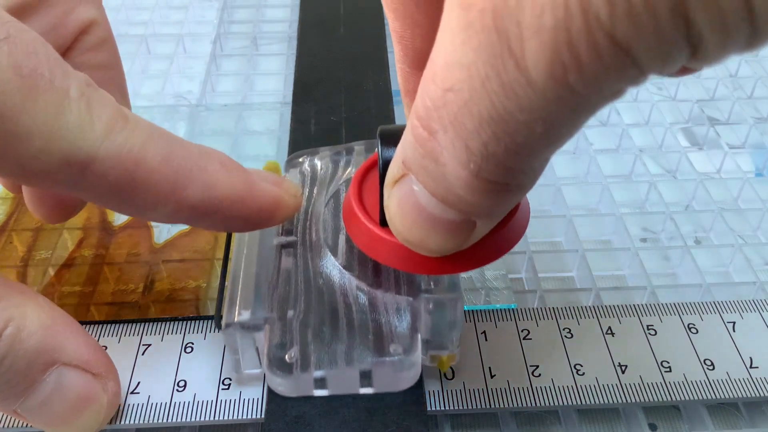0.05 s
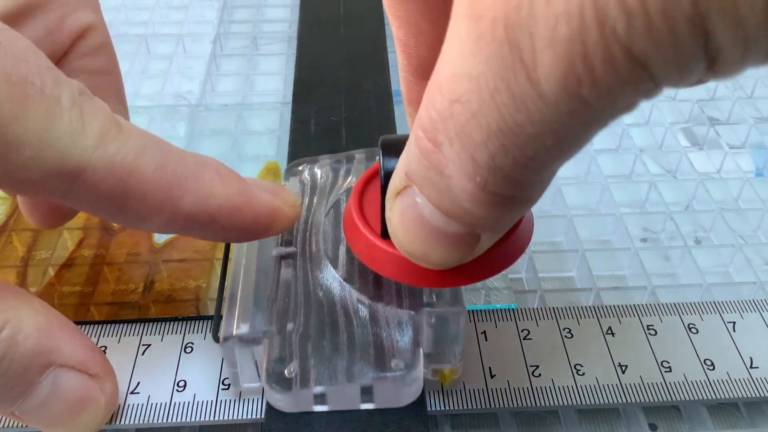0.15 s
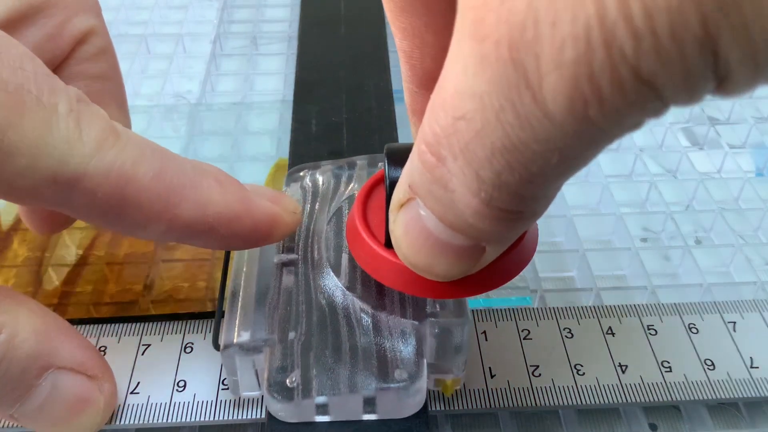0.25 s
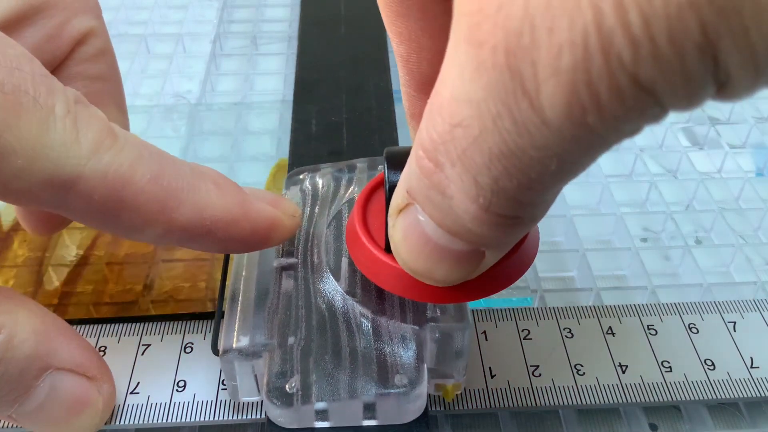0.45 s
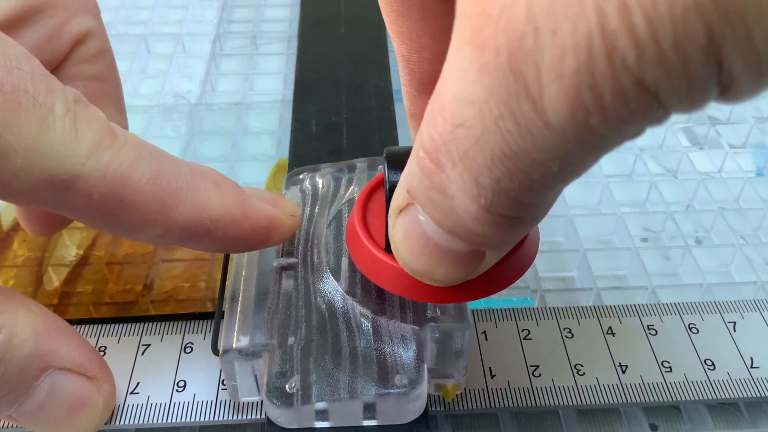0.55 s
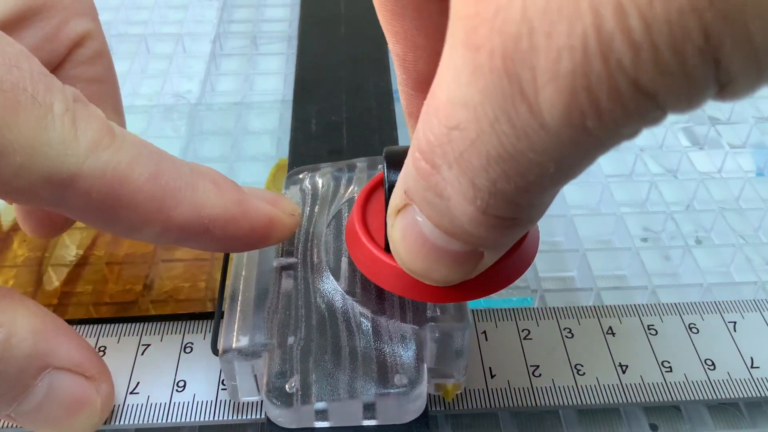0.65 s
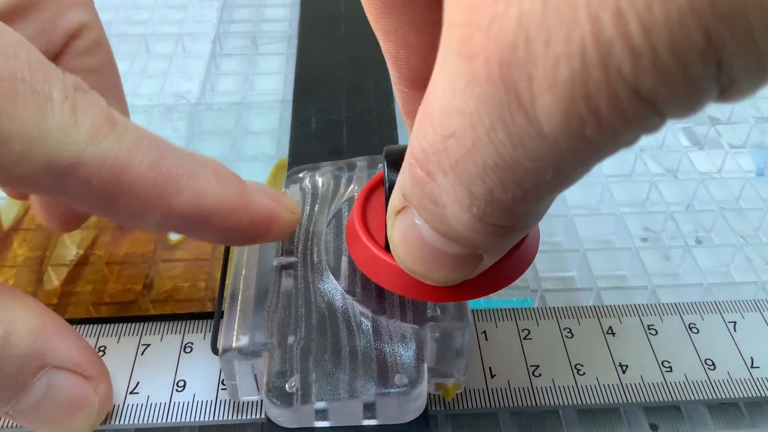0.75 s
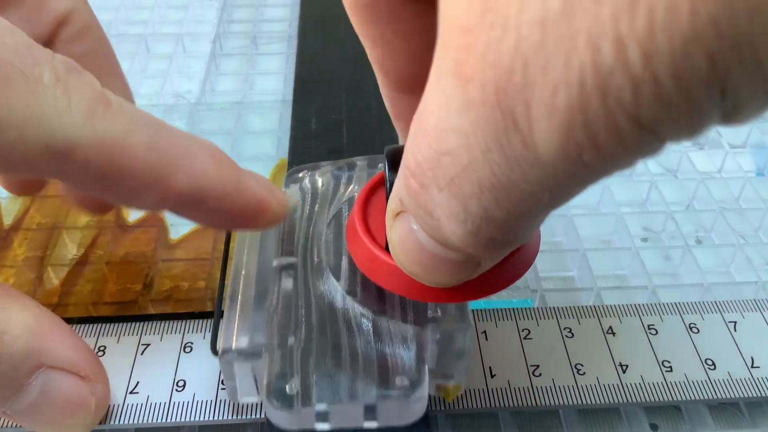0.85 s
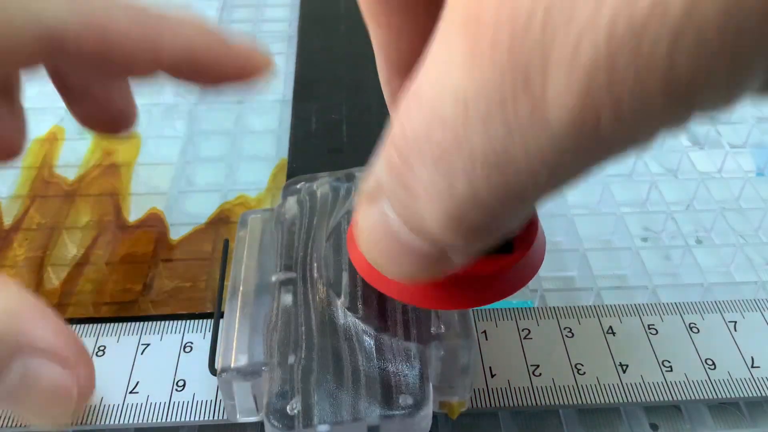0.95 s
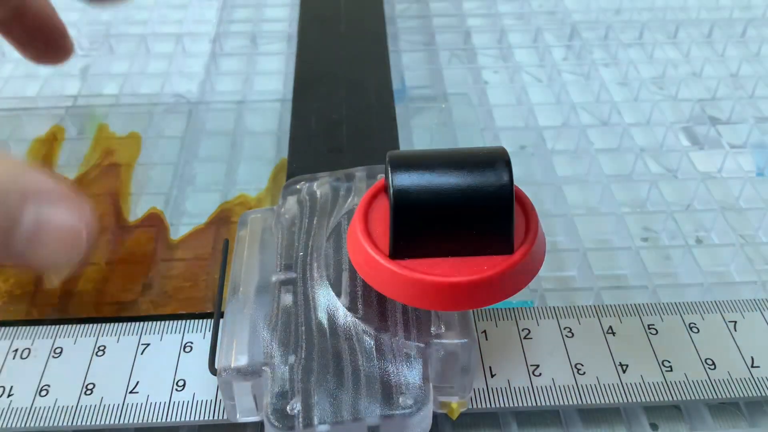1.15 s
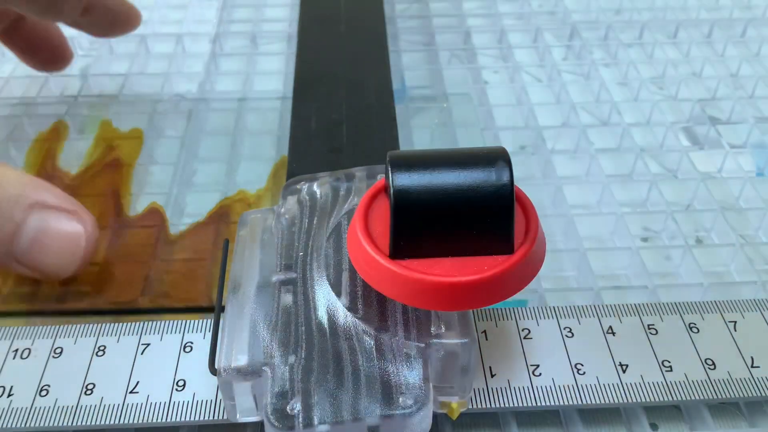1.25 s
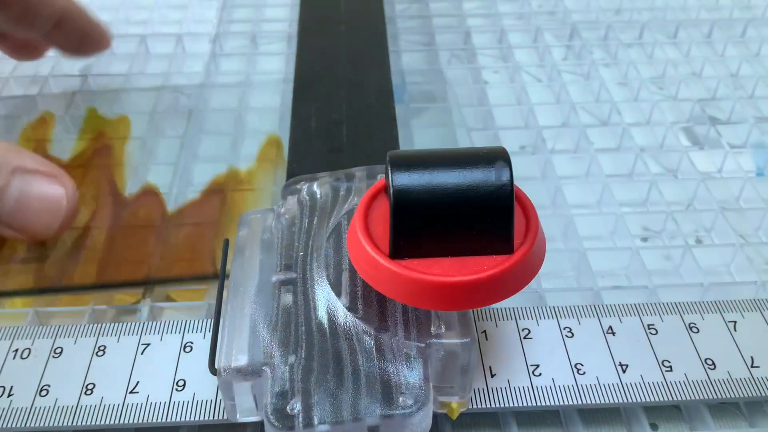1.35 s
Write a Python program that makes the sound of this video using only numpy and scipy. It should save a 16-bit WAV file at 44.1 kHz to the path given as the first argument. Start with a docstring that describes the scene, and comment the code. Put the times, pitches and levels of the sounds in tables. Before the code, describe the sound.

A plastic glass cutter's knob clacks down with quick clicks and a knock that thumps the workbench. Faint ticks follow, the knob springs back with a second knock, and a short scrape swells. Close up in a small room.

```python
"""A work bench in a small room, close up: a plastic glass cutter is handled on its guide bar.
Plastic rubs lightly on the bar and ticks over the dull rumble of the hands. The knob is pushed down
with a few clicks and a knock that shakes the bench, creaks under the thumb and springs back.
A rougher scrape swells at the end. Clicks and knocks are impulses that ring the cutter's modes
and shell; rubbing and scraping are thousands of tiny slips."""
import sys
import numpy as np
from scipy import signal
from scipy.fft import rfft, irfft
from scipy.io import wavfile
from scipy.ndimage import uniform_filter1d

SR = 44100
rng = np.random.default_rng(int(sys.argv[2]) if len(sys.argv) > 2 else 0)


def wav_record(signal):
    """Record a signal, one row per channel, as 16-bit PCM in the file named by sys.argv[1]."""
    frames = np.transpose(np.atleast_2d(signal))
    bounded = np.clip(frames, -1, 1)
    # unit amplitude maps onto the largest positive 16-bit level
    quanta = np.round(bounded * 32767).astype(np.int16)
    wavfile.write(sys.argv[1], SR, quanta)


N = 61739
T = np.arange(N) / SR
FFT_SIZE = 2 ** 16
HZ = np.maximum(np.arange(FFT_SIZE // 2 + 1) * SR / FFT_SIZE, 1)


def from_db(db):
    """Decibels to gain."""
    return 10 ** (np.asarray(db) / 20)


def at_hz(points, hz=HZ):
    """Read a table on a log-frequency axis."""
    freqs, values = np.transpose(points)
    return np.interp(np.log(hz), np.log(freqs), values)


def fader(curve):
    """Gain over time from a dB curve."""
    return from_db(np.interp(T, *np.transpose(curve)))


def eq(x, db):
    """Minimum-phase EQ with the given dB at every frequency: no ringing ahead of an attack."""
    cepstrum = irfft(np.log(from_db(db)))
    cepstrum[1:FFT_SIZE // 2] *= 2
    cepstrum[FFT_SIZE // 2 + 1:] = 0
    return irfft(rfft(x, FFT_SIZE) * np.exp(rfft(cepstrum)))[..., :N]


def low_cut(x, hz):
    """Second-order high-pass."""
    return signal.sosfilt(signal.butter(2, hz, "high", fs=SR, output="sos"), x)


def through(x, response):
    """Play a force or sound through a stereo response."""
    return signal.fftconvolve(np.atleast_2d(x), response, axes=-1)[:, :N]


def click(time, db):
    """One impulse."""
    return from_db(db) * (np.arange(N) == int(time * SR))


def decay(t60):
    """Envelope that falls 60 dB in t60 seconds."""
    return from_db(-60 * T / t60)


def ring(hz, t60):
    """A dying sine."""
    return np.sin(2 * np.pi * hz * T) * decay(t60)


def resonance(hz, t60):
    """Response of one mode, with gain 1 on its peak."""
    return ring(hz, t60) * 2 * np.log(1000) / (t60 * SR)


# Stereo image of the noise: (frequency [Hz], left-right likeness [0..1])
STEREO_LIKENESS = [(60, 1), (200, 1), (500, 0.17), (1500, .5), (4000, 0.55), (12000, 0.061)]


def noise(db=0):
    """Stereo noise with a given spectrum, centred in the bass and wide on top."""
    mid, side = rfft(rng.standard_normal((2, FFT_SIZE)))
    alike = at_hz(STEREO_LIKENESS)
    stereo = np.sqrt((1 + alike) / 2) * mid + np.sqrt((1 - alike) / 2) * side * [[1], [-1]]
    return irfft(stereo * from_db(db))[:, :N]


def flatten(response, width_hz=158):
    """Level the broad humps and holes of a random response, channel by channel."""
    bins = int(width_hz * FFT_SIZE / SR) + 1
    power = uniform_filter1d(np.abs(rfft(response, FFT_SIZE)) ** 2, size=bins, axis=-1)
    return np.array([eq(x, -10 * np.log10(p + 1e-6)) for x, p in zip(response, power)])


def dense_tail(t60s, build_s):
    """Countless modes: noise that builds up and dies band by band, with even energy per hertz."""
    white, tail = rfft(noise(), FFT_SIZE), 0
    edges = np.r_[0, np.geomspace(150, SR / 2, 15)]
    attack = 1 - np.exp(-T / build_s)
    for low, high in zip(edges, edges[1:]):
        band = irfft(white * ((HZ >= low) & (HZ < high)))[:, :N]
        band *= attack * decay(at_hz(t60s, (low + high) / 2))
        energy = np.sum(band ** 2, axis=1, keepdims=True)
        tail = tail + band * np.sqrt(2 * (high - low) / SR / energy)
    return flatten(tail)


def friction(curve, tone, slips_per_s=2200, spread_db=4.5):
    """Force of sliding: a grainy stream of tiny slips of uneven size."""
    slips = (rng.random(N) < slips_per_s / SR) * rng.choice([-1, 1], N)
    slips = slips * from_db(spread_db * np.minimum(rng.exponential(1, N), 4))
    return eq(slips / slips.std() * fader(curve), at_hz(tone))


# Decay of the plastic shell: (frequency [Hz], t60 [s])
SHELL_DECAY = [(200, 0.11), (1500, 0.035), (5000, 0.039), (15000, .022)]


def shell():
    """The shell's crowd of short modes answers a contact with a brief clatter."""
    return dense_tail(SHELL_DECAY, build_s=0.00017)


# The cutter's clear modes:
# (frequency [Hz], touched [dB], pressed [dB], released [dB], t60 [s], left minus right [dB])
CUTTER_MODES = [(464, 6.5, 12, 1.5, 0.056, 9), (989, -1.5, 12.5, 4, 0.029, 1.5),
                (1327, -7.5, 5, 7, 0.046, 15.5), (1393, -8.5, 20.5, 3, .07, -7),
                (1590, 8.5, 12, 6, 0.017, -3), (1900, 2, -7, 7.5, 0.024, -1), (2058, -6, 1, 4, 0.15, -3),
                (2463, 8, 16, -4, 0.047, 13.5), (2694, 6, -7, -20, .028, -2),
                (3002, 7.5, 3.5, 5, 0.013, -0.5), (3653, 0, 9, -7, 0.036, 3),
                (4015, 4.5, 0.5, -1, 0.016, -4.5), (5084, 8, 14, 10.5, 0.011, 8),
                (5120, -14, 11.5, 31, .06, 2.5), (6900, 3.5, 7, -20, 0.0083, -0.5),
                (8104, 4.5, 8, 3, 0.017, 9.5), (8930, 0.5, 1.5, 13, 0.11, 3.5),
                (9700, -2.5, 1, 11, 0.037, 1), (10700, 12, 13.5, -3, 0.047, 3.5),
                (11780, 4.5, 7, -5, 0.044, 4), (13500, 3.5, 10.5, -3, 0.042, 3),
                (15000, 5.5, 3, 6, 0.039, 0.5)]
# Shell clatter under the modes: (touched [dB], pressed [dB], released [dB])
CLATTER_LEVELS = [-6.5, -3.5, 2]


def cutter_body():
    """Responses of the cutter when touched, pressed and released: clear modes over shell clatter."""
    modes = 0
    for k, (hz, *levels_db, t60, pan_db) in enumerate(CUTTER_MODES):
        pan = from_db([[pan_db / 2], [-pan_db / 2]])
        mode = (-1) ** k * pan * resonance(hz, t60)
        modes = modes + from_db(levels_db)[:, None, None] * mode
    clatter = from_db(CLATTER_LEVELS)[:, None, None] * low_cut(shell(), hz=700)
    touched, pressed, released = modes + clatter
    snap = noise() * decay(t60=0.005)  # the dry edge of a light contact
    snap /= np.linalg.norm(snap, axis=1, keepdims=True)
    return touched + from_db(-2.5) * snap, pressed, released


# Fader ride of the light rub: (time [s], level [dB])
RUB_RIDE = [(0, -53.5), (.018, -72.5), (.04, -61.5), (.08, -60), (.097, -68), (.12, -56.5), (.16, -70.5),
            (.2, -64), (.34, -64), (.38, -61.5), (.44, -89.5), (.73, -93), (.8, -70), (.835, -63),
            (.86, -71), (.885, -57), (.925, -62.5), (.97, -72), (1.17, -93), (1.23, -70.5), (1.28, -56.5),
            (1.34, -56), (1.4, -52)]
# Its bright tone: (frequency [Hz], level [dB])
RUB_TONE = [(200, -9.5), (900, -0.5), (1800, 7.5), (2700, -0.5), (5500, 0), (8000, -2), (11000, 1.5),
            (15000, -2), (16000, -12)]


def bar_rub():
    """Force of plastic slipping lightly along the guide bar."""
    return friction(RUB_RIDE, RUB_TONE)


# Fader ride of the scrape, short bursts and a closing swell: (time [s], level [dB])
SCRAPE_RIDE = [(0, -60), (.19, -70.5), (.52, -86), (.575, -66), (.61, -65), (.65, -75.5), (.74, -82),
               (.81, -79), (.842, -44), (.857, -73), (.9, -51.5), (.93, -39.5), (1.1, -67), (1.19, -85.5),
               (1.243, -68.5), (1.252, -40.5), (1.3, -46.5), (1.34, -44.5), (1.37, -38.5), (1.382, -36.5),
               (1.4, -31.5)]
# Its mid-heavy drive: (frequency [Hz], level [dB])
SCRAPE_TONE = [(150, -2.5), (500, -0.5), (1000, 6), (2000, -1), (3300, -16.5), (5000, -11), (9000, -23),
               (15000, -26), (16000, -36.5)]
# Broad resonances of the tool, damped by the hand: (frequency [Hz], level [dB], t60 [s])
HELD_MODES = [(560, 1, 0.052), (926, 0.5, 0.014), (1360, 8.5, 0.059), (1620, 2.5, 0.0087), (1980, 3, 0.075),
              (2650, 4.5, .012), (4990, 12.5, 0.046), (6070, 5, .012), (6440, 1.5, .03), (6700, 5, .03),
              (8150, 7.5, .03), (9040, 9.5, 0.018), (10630, 5.5, .03), (12000, 7.5, 0.011),
              (13350, 6, .012), (14900, 6, 0.016)]


def scrape():
    """Heavier friction on the work surface rings the held tool and its shell."""
    modes = sum((-1) ** k * from_db(db) * resonance(hz, t60) for k, (hz, db, t60) in enumerate(HELD_MODES))
    return through(friction(SCRAPE_RIDE, SCRAPE_TONE), modes + from_db(-3) * shell())


def rumble(tone):
    """Steady shaped noise of rms 1."""
    x = noise(at_hz(tone))
    return x / x.std()


# Fader ride of the handling noise: (time [s], level [dB])
HANDS_RIDE = [(0, -46.5), (.09, -70.5), (.14, -53.5), (.19, -60.5), (.38, -53), (.47, -52.5), (.55, -74.5),
              (.645, -68), (.68, -50), (.72, -55), (.78, -72), (.84, -47.5), (.92, -57.5), (1.0, -50.5),
              (1.08, -59), (1.18, -75.5), (1.24, -58.5), (1.28, -42), (1.34, -52.5), (1.4, -42)]
# Its bassy tone: (frequency [Hz], level [dB])
HANDS_TONE = [(25, -8.5), (42, 0), (70, -11.5), (130, 0.5), (200, -2), (280, 0), (360, -10.5), (600, -16),
              (1500, -47.5)]


def hands():
    """Hands on the tool make a dull rumble that comes and goes."""
    return fader(HANDS_RIDE) * rumble(HANDS_TONE)


# Tone of the background bed: (frequency [Hz], level [dB])
BED_TONE = [(20, -1), (40, -1), (70, -12), (200, -9), (450, -28.5), (1600, -44), (4000, -42),
            (16000, -46.5)]


def background():
    """A faint, steady bed of low rumble with a trace of hiss."""
    return from_db(-63) * rumble(BED_TONE)


# Hard little clicks: (time [s], level [dB], treble tilt [dB/octave])
TICK_CUES = [(0.0211, -8, 2), (.0230, -15.5, 5), (0.2122, -4.5, 0.5), (0.2164, 5.5, 1.5),
             (0.2172, -10, -6.5), (0.2241, 0, -5.5), (0.447, -21.5, -3.5), (0.6605, -34.5, -7),
             (0.6741, -32, -3.5), (.6895, -42.5, -6.5), (0.7034, -39.5, -9), (0.8321, -25, -4.5),
             (0.842, -32, -2), (1.0423, -37.5, -2), (1.273, -21.5, -.5), (1.2739, -26.5, 2.5)]
# Their common tone: (frequency [Hz], level [dB])
TICK_TONE = [(100, -14), (500, -15), (1100, -13), (1700, -0.5), (2200, -7.5), (2700, -4), (3300, -8.5),
             (4500, -9), (7000, -6.5), (11000, -3.5), (15000, -6)]


def plastic_ticks(pivot_hz=4000):
    """Force of plastic parts clicking together, each click with its own brightness."""
    octaves = np.log2(np.maximum(HZ, 1500) / pivot_hz)
    return sum(eq(click(time, db), at_hz(TICK_TONE) + tilt * octaves) for time, db, tilt in TICK_CUES)


# Blows that reach the bench: (time [s], level [dB])
THUMP_CUES = [(0.044, -44.5), (0.127, -50), (0.2384, -19.5), (0.372, -49.5), (0.454, -48.5), (.932, -40.5),
              (1.275, -42.5)]
# The bench's low modes: (frequency [Hz], level [dB], t60 [s])
BENCH_MODES = [(94, 0.5, .18), (189.7, -1.5, 0.11), (253.3, -10.5, 0.23), (495, -14, 0.21)]


def bench_boom(rise_s=0.001):
    """Blows ring the bench: a low boom in the centre."""
    modes = sum(from_db(db) * ring(hz, t60) for hz, db, t60 in BENCH_MODES)
    boom = modes * (1 - np.exp(-T / rise_s))
    blows = sum(click(time, db) for time, db in THUMP_CUES)
    return low_cut(through(blows, np.array([boom, boom])), hz=71)


def knock(contacts, tone):
    """Force of a quick run of contacts; the softer the contact, the lower its cut-off."""
    return sum(eq(click(time, db), at_hz(tone) - 10 * np.log10(1 + (HZ / cutoff_hz) ** 4))
               for time, db, cutoff_hz in contacts)


# Contacts of the knob going down: (time [s], level [dB], cut-off [Hz])
PRESS_CUES = [(.2266, 10, 9000), (.2286, 13, 2500), (.2302, 19.5, 12000), (.2320, 18, 9000),
              (.2362, 13.5, 1100)]
# Their full-bodied tone: (frequency [Hz], level [dB])
PRESS_TONE = [(60, -14), (200, -6.5), (350, -2), (500, -5), (1000, -7), (1600, -8), (2600, -9),
              (5000, -15.5), (8000, -18), (15000, -16.5)]


def knob_press():
    """Force of the knob hitting its stop: five contacts fuse into one knock."""
    return knock(PRESS_CUES, PRESS_TONE)


# Contacts of the knob coming up: (time [s], level [dB], cut-off [Hz])
RELEASE_CUES = [(.9301, 7, 6950), (.9321, 1.5, 3500)]
# Their tone, weighted to the mids: (frequency [Hz], level [dB])
RELEASE_TONE = [(60, -13.5), (250, 5.5), (550, -5.5), (1000, 2.5), (1800, -2.5), (2800, -8), (5000, -23),
                (8000, -30.5), (15000, -24)]


def knob_release():
    """Force of the knob springing back: a tight double hit."""
    return knock(RELEASE_CUES, RELEASE_TONE)


# Reverb sends: (raw contacts [dB], tool [dB], bench [dB])
ROOM_SENDS = [5, -6.5, -3]
# Reverb decay: (frequency [Hz], t60 [s])
ROOM_DECAY = [(100, 0.75), (260, .42), (700, 0.28), (1800, .34), (5000, 0.2), (13000, 0.073)]
# EQ on the reverb return: (frequency [Hz], level [dB])
ROOM_EQ = [(80, -18.5), (250, -5.5), (600, -14), (1500, -14.5), (4000, -17), (9000, -12), (15000, -17)]


def small_room(contacts, tool, boom):
    """Dense reflections from close walls, lingering longest in the bass."""
    send = sum(from_db(db) * x for db, x in zip(ROOM_SENDS, (contacts, tool, boom)))
    reverb = through(send, dense_tail(ROOM_DECAY, build_s=0.0043))
    return eq(reverb, at_hz(ROOM_EQ))


def lag_left(x, lag_s=0.00104):
    """The sound arrives a little later on the left."""
    return np.array([np.interp(T - lag_s, T, x[0], left=0), x[1]])


def scene(low_cut_hz=33):
    """Contact forces play the cutter's body, mixed with scrape, bench, room, hands and background."""
    touched, pressed, released = cutter_body()
    light = bar_rub() + plastic_ticks()
    press, release = knob_press(), knob_release()
    tool = through(light, touched) + through(press, pressed) + through(release, released)
    tool = low_cut(tool + scrape(), low_cut_hz)
    contacts = low_cut(light + press + release, low_cut_hz)
    boom = bench_boom()
    room = small_room(contacts, tool, boom)
    return lag_left(tool + boom + room + hands() + background())


def record(dry, cutoff_hz=16300):
    """A steep high cut on the whole mix."""
    return signal.sosfilt(signal.ellip(10, .2, 80, cutoff_hz, fs=SR, output="sos"), dry)


dry = scene()
out = record(dry)
wav_record(out)
```